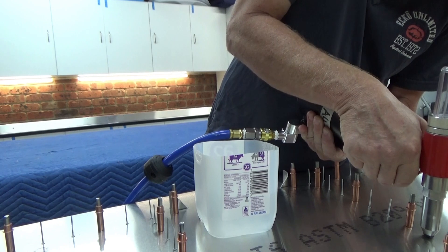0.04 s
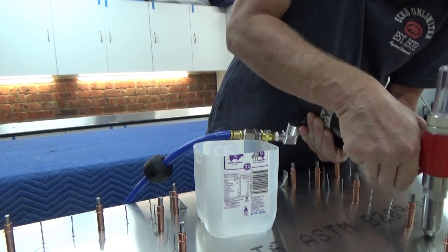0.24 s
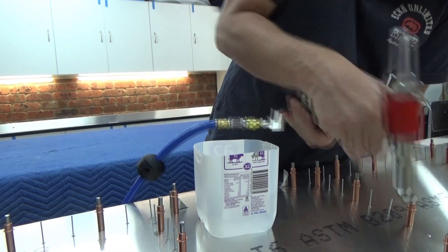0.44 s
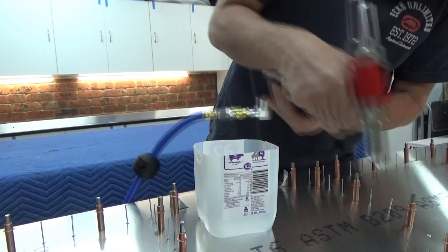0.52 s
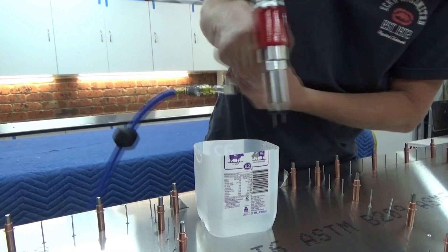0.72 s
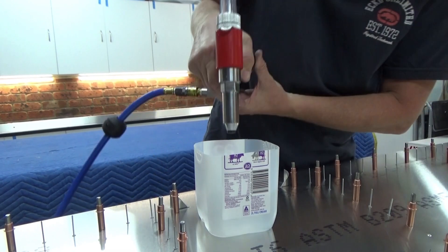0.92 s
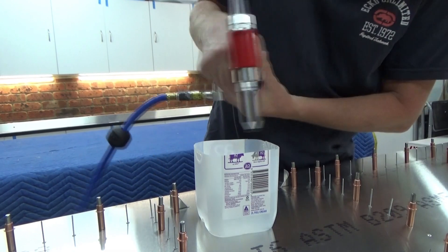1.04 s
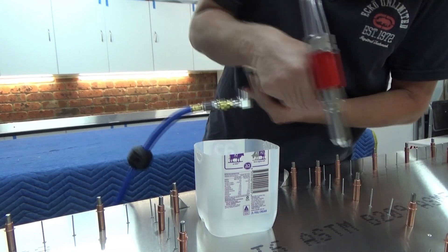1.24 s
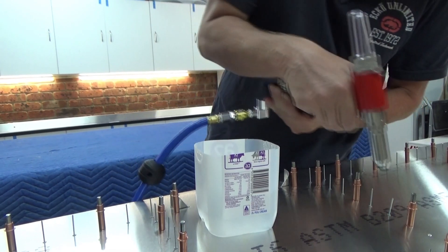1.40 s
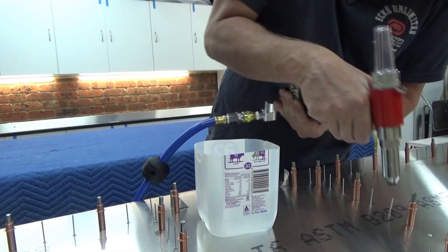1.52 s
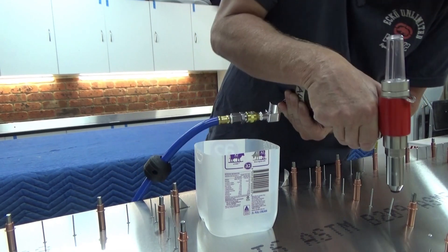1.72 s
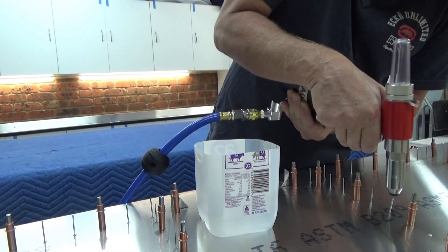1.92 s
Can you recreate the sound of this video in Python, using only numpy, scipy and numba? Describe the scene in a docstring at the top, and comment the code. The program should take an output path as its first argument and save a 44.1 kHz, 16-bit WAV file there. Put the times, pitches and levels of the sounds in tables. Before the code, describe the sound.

A pneumatic rivet gun jolts a metal sheet, blasts a bright hiss of air that clicks off, then a steel stem cracks and bounces in a plastic tub; close stereo in a quiet, humming workshop.

```python
"""Workshop, quiet and humming, heard in close stereo. A pneumatic rivet gun pulls a rivet in an aluminium skin:
random jolts through filters shake the sheet, and jet noise with gliding bands hisses until the valve clicks shut.
The sheet flexes (narrow noise bands); the spent steel stem drops into a plastic tub, bounces and rattles
(noise cracks, damped modes, dense grains). The gun nose is set down on the sheet (modes, noise wash), then slides."""
import sys
import numpy as np
from scipy import signal
from scipy.fft import rfft, irfft
from scipy.io import wavfile
from scipy.ndimage import uniform_filter1d
from numba import njit

SR = 44100
rng = np.random.default_rng(int(sys.argv[2]) if len(sys.argv) > 2 else 0)


def output_pcm(signal):
    """Save a mono or channel-first signal as 16-bit PCM at the path in sys.argv[1].

    Samples are clipped to [-1, 1] before scaling.
    """
    pcm = np.clip(np.atleast_2d(signal).T, -1, 1) * 32767
    wavfile.write(sys.argv[1], SR, np.round(pcm).astype(np.int16))


N = 85995
T = np.arange(N) / SR


def undb(db):
    """Decibels to gain."""
    return 10 ** (np.asarray(db) / 20)


def unit(x):
    """Scale to rms 1."""
    return x / np.sqrt(np.mean(x ** 2) + 1e-18)


def decay(t, t60_s):
    """Exponential fall of 60 dB in t60_s."""
    return np.exp(-np.log(1000) * t / t60_s)


def over_hz(table, hz):
    """Table interpolated on a log-frequency axis."""
    a = np.array(table, float)
    return np.interp(np.log(np.maximum(hz, 1)), np.log(a[:, 0]), a[:, 1])


def colour(x, table):
    """Filter by a magnitude response in dB, via FFT."""
    n = x.shape[-1]
    gain = undb(over_hz(table, np.fft.rfftfreq(n, 1 / SR)))
    return irfft(rfft(x) * gain, n)


def curve(table, axis=1):
    """Table column interpolated over time."""
    a = np.array(table, float)
    return np.interp(T, a[:, 0], a[:, axis])


def level(table, axis=1):
    """Gain from a dB column, silent outside its time span."""
    inside = (T >= table[0][0]) * (T <= table[-1][0])
    return undb(curve(table, axis=axis)) * inside


def grains(per_s, spread_db):
    """Random single-sample clicks of uneven size."""
    hits = rng.random(N) < per_s / SR
    return hits * rng.standard_normal(N) * undb(spread_db * rng.exponential(size=N))


def flicker(rate_hz):
    """Twice-smoothed noise, rms 1."""
    n = int(SR / rate_hz)
    return unit(uniform_filter1d(uniform_filter1d(rng.standard_normal(N), n), n))


@njit
def svf(x, hz, width):
    """State-variable band-pass whose centre may move; width in Hz."""
    y, b, l = np.empty(len(x)), 0., 0.
    for i in range(len(x)):
        g, k = np.tan(np.pi * hz[i] / SR), width / hz[i]
        v = (b + g * (x[i] - l)) / (1 + g * (g + k))
        b, l, y[i] = 2 * v - b, l + 2 * g * v, k * v
    return y


def band(hz, width_hz):
    """Noise through one resonance, rms 1."""
    return unit(svf(rng.standard_normal(N), hz + 0 * T, 1. * width_hz))


def ring(x, modes):
    """Decaying modes struck by x: one complex pole each."""
    out = 0
    for hz, db, t60_s in modes:
        pole = np.exp(2j * np.pi * hz / SR - np.log(1000) / (max(t60_s, .005) * SR))
        out = out + undb(db) * signal.lfilter([1], [1, -pole], x).imag
    return out


def tail(t60s, channels):
    """Half a second of noise, each half octave dying at its own rate."""
    t, out = T[:SR // 2], 0
    for hz in 60 * 2 ** (np.arange(17) / 2):
        noise = [svf(rng.standard_normal(len(t)), hz + 0 * t, hz / 2.8) for _ in range(channels)]
        out = out + np.array(noise) * decay(t, over_hz(t60s, hz))
    return out


def add(out, x, s):
    """Mix x into out at s seconds."""
    i = int(s * SR)
    out[i:i + len(x)] += x[:N - i]


def pan(x, left_db):
    """Left and right copies, left_db apart in level."""
    return x * undb(np.array([[left_db], [-left_db]]) / 2)


# workshop spectrum: f/Hz, relative level/dB
SHOP_SPECTRUM = [(30, -28.5), (42, 9), (171, 6), (379, -4.5), (516, -4), (979, -9.5), (1680, -12),
                 (2220, -15.5), (3910, -18), (4220, -21.5), (5590, -22), (6360, -21.5), (16000, -30.5)]
# narrow hums: f/Hz, width/Hz, level/dB
HUMS = [(520, 15, -59), (3750, 380, -63)]
SHOP_DB = -49


def shop():
    """Workshop rumble and hiss as mid and side noise, plus two narrow wavering hums."""
    hums = sum(undb(db + 4.2 * flicker(4.5)) * band(hz, width_hz) for hz, width_hz, db in HUMS)
    air = np.array([unit(colour(rng.standard_normal(N), SHOP_SPECTRUM)) for _ in range(2)])
    return undb(SHOP_DB + 1.2 * flicker(12)) * air + hums * [[1], [.2]]  # hums mostly mid


# sheet under the stroke: t/s, boom level/dB, rattle level/dB
STROKE_LEVELS = [(.17, -48, -54), (.178, -42, -36.5), (.195, -42, -53), (.204, -39, -53),
                 (.211, -13, -20.5), (.22, -25.5, -13.5), (.25, -19, -25.5), (.272, -29.5, -22.5),
                 (.28, -25.5, -24.5), (.305, -28, -17), (.318, -41.5, -10.5), (.33, -37, -22),
                 (.338, -54, -37)]
# rattle spectrum: f/Hz, relative level/dB
SHAKE_SPECTRUM = [(60, -15.5), (170, -13), (260, 6), (400, -11), (520, -7.5), (900, -13.5), (1250, -9.5),
                  (2500, -20), (5000, -43)]
SHAKE_PER_S, SHAKE_SPREAD_DB = 3000, 2.5
BOOM_HZ, BOOM_WIDTH_HZ = 108, 120


def stroke():
    """Piston stroke: uneven jolts rattle the sheet over one low boom resonance."""
    shake = unit(colour(grains(SHAKE_PER_S, SHAKE_SPREAD_DB), SHAKE_SPECTRUM))
    boom = band(BOOM_HZ, BOOM_WIDTH_HZ)
    return shake * level(STROKE_LEVELS, axis=2) + boom * level(STROKE_LEVELS)


# trigger and valve clicks: t/s, peak level/dB, f/Hz, decay t60/s
CLICK_EVENTS = [(0.173, -39, 8500, .001), (0.8340, -12.5, 2410, .003), (0.8350, -10, 3795, .0035),
                (0.8340, -25, 1300, .003), (0.8424, -22, 3400, .004), (1.8442, -39, 8500, .001)]


def clicks():
    """Trigger and valve: short damped sines with a linear onset."""
    out, t = np.zeros(N), T[:2048]
    for s, db, hz, t60_s in CLICK_EVENTS:
        x = np.sin(2 * np.pi * hz * t) * t * decay(t, t60_s)
        add(out, undb(db) * x / np.abs(x).max(), s)
    return out


# exhaust: t/s, level/dB
EXHAUST_LEVEL = [(0.195, -95), (0.209, -14), (0.213, -16), (0.297, -12.5), (0.331, -17.5), (0.339, -13),
                 (0.483, -13), (0.515, -17), (0.827, -27.5), (0.84, -24), (0.846, -44)]
# jet spectrum: f/Hz, relative level/dB
JET_SPECTRUM = [(250, -49.5), (450, -14.5), (1000, -15.5), (1600, -8), (3000, -4), (4500, -4.5), (6500, -4),
                (11000, -3), (13500, -10), (16000, -22)]
# bands gliding as the gun moves: start t/s, end t/s, start f/Hz, end f/Hz, width/Hz, level re jet/dB
GLIDING_BANDS = [(.18, 0.57, 8170, 8380, 980, -1.5), (0.15, 0.54, 7150, 7280, 1300, -1),
                 (.3, .56, 6600, 6230, 590, -5.5), (0.23, 0.68, 5700, 5200, 620, -7),
                 (0.51, .8, 5000, 4100, 480, -10), (0.13, 0.52, 9300, 9000, 1200, -6),
                 (0.413, .62, 11200, 8600, 2000, -3), (.47, 0.73, 9600, 9100, 1300, -3),
                 (0.54, 0.74, 8900, 7000, 1000, -3), (0.54, 0.837, 10300, 9300, 990, 0),
                 (.59, 0.775, 11300, 8700, 800, -2.5), (0.64, 0.75, 14100, 12300, 1200, -7),
                 (0.55, 0.74, 3300, 3200, 600, -4.5), (0.782, 0.798, 7200, 7900, 880, 0.5),
                 (0.46, 0.58, 1630, 1760, 700, -11.5)]
FLICKER_DB, BAND_FLICKER_DB = 1, 1.8


def exhaust():
    """Exhaust air: broadband jet noise with bands that swell, glide and fade."""
    mix, power = unit(colour(rng.standard_normal(N), JET_SPECTRUM)), 1
    for start, end, from_hz, to_hz, width_hz, db in GLIDING_BANDS:
        share = np.clip((T - start) / (end - start), 0, 1)
        hz = from_hz + (to_hz - from_hz) * share
        swell = undb(db + BAND_FLICKER_DB * flicker(33)) * np.sqrt(np.sin(np.pi * share) + 1e-9)
        # filtered twice: steeper skirts
        mix = mix + swell * unit(svf(band(hz, width_hz), hz, 1. * width_hz))
        power = power + swell ** 2
    steady = mix / np.sqrt(power)  # bands tint the jet, power stays even
    return steady * level(EXHAUST_LEVEL) * undb(FLICKER_DB * flicker(55))


# sheet flexing as the gun lifts away: t/s, level/dB, f/Hz
FLEX_CURVE = [(0.4, -44, 249), (0.496, -41.5, 196), (0.56, -32.5, 161.4), (0.59, -34.5, 148),
              (0.682, -40.5, 192), (0.722, -35, 183.5), (0.824, -43, 165), (0.944, -44, 144),
              (0.98, -46, 173)]
# rumble while the gun moves: t/s, level/dB
RUMBLE_LEVEL = [(0.36, -42.5), (0.402, -50), (0.472, -43.5), (0.812, -46), (1.0, -55)]
FLEX_WIDTH_HZ, RUMBLE_HZ, RUMBLE_WIDTH_HZ = 40, 53.4, 48.3


def flex():
    """Released sheet: a narrow noise band of moving pitch over a low rumble."""
    bend = band(curve(FLEX_CURVE, axis=2), FLEX_WIDTH_HZ) * level(FLEX_CURVE)
    return bend + band(RUMBLE_HZ, RUMBLE_WIDTH_HZ) * level(RUMBLE_LEVEL)


# stem bounces: t/s, peak level/dB, tub ring re peak/dB, steel ring re peak/dB, treble/dB, snap f/Hz
BOUNCE_EVENTS = [(0.9937, -3, -8, -4, -3.5, 3400), (1.045, -3, -11, -23, 12, 3530),
                 (1.0976, -4, -7, -7, 3.5, 4970), (1.1376, -3.5, -25, -9, 10, 9400),
                 (1.1402, -1, -28, -7, 1, 4220), (1.1752, -19.5, -26, -20, 2, 9500),
                 (1.2044, -5.5, -10, -37, 6, 8600), (1.2212, -21, -33, -16, 21, 7000),
                 (1.283, -25, -6, -13, 10, 8220)]
# crack spectrum: f/Hz, relative level/dB
CRACK_SPECTRUM = [(180, -23), (300, 0), (645, -4), (1100, -8.5), (2930, 6), (6960, -13.5), (9390, 0),
                  (13300, -48), (16000, -46)]
# tub modes: f/Hz, level/dB, t60/s
TUB_MODES = [(389, -13, 0.082), (584, -6, 0.1), (701, -7.5, 0.082), (904, -5, 0.037), (1505, -8, 0.035),
             (1764, 2, 0.0265), (2135, 5, 0.016)]
# steel stem modes: f/Hz, level/dB, t60/s
STEM_MODES = [(2775, -8, .025), (3150, -10, .02), (3610, -8, .025), (3810, -10, .02), (4500, -12, .02),
              (6200, -14, .015), (9300, -8, .012)]
# chatter on the tub floor: t/s, level/dB, hollow note level/dB
RATTLE_LEVELS = [(.995, -20, -24), (1.04, -20.5, -31), (1.06, -27, -35), (1.09, -31.5, -31),
                 (1.13, -36, -39), (1.145, -24, -57), (1.18, -29.5, -40), (1.2, -33.5, -49),
                 (1.21, -32.5, -24), (1.235, -36, -37.5), (1.258, -39, -35.5), (1.3, -39.5, -40),
                 (1.4, -95.5, -74)]
# chatter spectrum: f/Hz, relative level/dB
CHATTER_SPECTRUM = [(150, -46), (250, -7), (674, -3.5), (1450, -2.5), (1730, 2), (4190, -1), (4900, -5.5),
                    (9170, -9), (13900, -33), (16000, -53.5)]
# hollow tub note as the stem settles: t/s, f/Hz
HOLLOW_PITCH = [(1.0, 613), (1.12, 597), (1.2, 718), (1.3, 690)]
CRACK_T60_S, TREBLE_HZ = .016, 6620
SNAP_DB, SNAP_T60_S, SNAP_WIDTH_RATIO = 0, .006, .6  # dB re crack; width / centre
RATTLE_PER_S, RATTLE_SPREAD_DB, RATTLE_RING_DB = 14000, 1.5, -14.5
HOLLOW_WIDTH_HZ, TUB_LOW_CUT_HZ = 85, 288


def crack(treble_db, snap_hz):
    """One impact: coloured noise burst plus a shorter band-passed snap of first contact, peak 1."""
    t = T[:2048]
    x = colour(rng.standard_normal(len(t)), CRACK_SPECTRUM)
    x = colour(x, [(TREBLE_HZ / 2, 0), (TREBLE_HZ, treble_db)]) * decay(t, CRACK_T60_S)
    burst = rng.standard_normal(len(t)) * decay(t, SNAP_T60_S)
    snap = svf(burst, snap_hz + 0 * t, SNAP_WIDTH_RATIO * snap_hz)
    x = x / np.abs(x).max() + undb(SNAP_DB) * snap / np.abs(snap).max()
    return x / np.abs(x).max()


def stem():
    """Stem in tub: bounces crack and excite modes; dense grains chatter and a hollow noise band sounds."""
    out, tub, steel = np.zeros(N), np.zeros(N), np.zeros(N)
    for s, db, tub_db, steel_db, treble_db, snap_hz in BOUNCE_EVENTS:
        add(out, undb(db) * crack(treble_db, snap_hz), s)
        add(tub, undb(db + tub_db) * np.hanning(12) / 12, s)
        add(steel, undb([db + steel_db]) / 2, s)
    chatter = grains(RATTLE_PER_S, RATTLE_SPREAD_DB)
    ringing = unit(ring(chatter, TUB_MODES + STEM_MODES))
    rattle = unit(unit(colour(chatter, CHATTER_SPECTRUM)) + undb(RATTLE_RING_DB) * ringing)
    hollow = band(curve(HOLLOW_PITCH), HOLLOW_WIDTH_HZ) * level(RATTLE_LEVELS, axis=2)
    out = out + ring(tub, TUB_MODES) + ring(steel, STEM_MODES)
    out = out + rattle * level(RATTLE_LEVELS) + hollow
    low_cut = signal.butter(3, TUB_LOW_CUT_HZ, "high", fs=SR, output="sos")
    return signal.sosfilt(low_cut, out)


# sheet modes: f/Hz, level/dB, t60/s
SHEET_MODES = [(138, -2.5, 0.83), (211, -23, 0.84), (440, 2, 0.13), (522, -10, 1.27), (549, -12, 0.92),
               (692, 3, 0.33), (1016, -13, .12), (1360, -12, 0.12), (1740, 2, 0.085), (2680, -17, 0.14)]
# set-down wash spectrum: f/Hz, relative level/dB
WASH_SPECTRUM = [(59, -48), (100, -20), (415, -4), (621, -3), (801, -2.5), (891, -8.5), (1800, -13),
                 (4980, -22), (7600, -20), (9500, -13.5), (11000, -25.5), (16000, -42.5)]
# wash decay: f/Hz, t60/s
WASH_DECAY = [(100, 0.62), (700, 0.18), (2500, 0.19), (8000, 0.12), (16000, 0.068)]
# nose sliding onto the next stem: t/s, level/dB
SLIDE_LEVEL = [(1.765, -72.5), (1.775, -53), (1.79, -56), (1.81, -49), (1.85, -52.5), (1.9, -70.5)]
SET_DOWN_S, SET_DOWN_DB, SET_DOWN_TICK_DB, WASH_DB = 1.4872, -30, -29, -22
LATE_WASH_DB, LATE_WASH_STRETCH = -11.5, 2.3
SLIDE_HZ, SLIDE_WIDTH_HZ = 2300, 1500


def nose():
    """Nose on sheet: tick, struck modes, noise wash with a faint longer tail; then grains slide."""
    out, blow = np.zeros(N), np.zeros(N)
    add(blow, undb(SET_DOWN_DB) * np.hanning(10) / 5, SET_DOWN_S)
    late = tail([(hz, LATE_WASH_STRETCH * t60_s) for hz, t60_s in WASH_DECAY], channels=1)
    wash = tail(WASH_DECAY, channels=1) + undb(LATE_WASH_DB) * late
    wash = colour(wash[0], WASH_SPECTRUM)
    onset_rms = np.sqrt(np.mean(wash[:1000] ** 2))
    add(out, undb(WASH_DB) * wash / onset_rms, SET_DOWN_S)
    add(out, undb(SET_DOWN_TICK_DB) * np.diff(np.hanning(8)), SET_DOWN_S)
    slide = unit(svf(grains(12000, 0.95), SLIDE_HZ + 0 * T, 1. * SLIDE_WIDTH_HZ))
    return out + ring(blow, SHEET_MODES) + slide * level(SLIDE_LEVEL)


# room decay: f/Hz, t60/s
ROOM_DECAY = [(100, 0.69), (1000, 0.38), (4000, 0.39), (16000, 0.073)]
# side filter, room and workshop: f/Hz, level/dB
FAR_WIDTH = [(30, -36.5), (500, -11.5), (1500, -5), (4000, -9), (16000, -30)]
# side filter, stroke: f/Hz, level/dB
STROKE_WIDTH = [(100, -14.5), (1000, -7), (3000, -4)]
# side filter, diffuse smear of the near sounds: f/Hz, level/dB
NEAR_WIDTH = [(200, -24.5), (1300, -18), (2400, -22.5), (4400, -35.5), (8000, -24), (16000, -33)]
ROOM_DB, STROKE_ROOM_DB, ROOM_RISE_S = -14.5, -8, 0.017
STROKE_LEFT_DB, NEAR_LEFT_DB = 2.8, -.8  # left minus right
SMEAR_T60_S = .01


def scene():
    """Near sources panned; side adds room, workshop, the same stroke in independent noise, a near smear."""
    pull = stroke()
    near = clicks() + exhaust() + flex() + stem() + nose()
    room = tail(ROOM_DECAY, channels=2) * np.minimum(T[:SR // 2] / ROOM_RISE_S, 1)
    room = room / np.sqrt(np.sum(room ** 2) / 2)
    send = near + undb(STROKE_ROOM_DB) * pull
    wet = signal.fftconvolve(send[None], room, axes=1)[:, :N]
    mid, side = undb(ROOM_DB) * wet + shop()
    side = colour(side, FAR_WIDTH)
    side = side + colour(stroke(), STROKE_WIDTH)  # same stroke, fresh noise: stereo spread
    # short diffuse noise smear of the near sounds, side only
    smear = rng.standard_normal(1024) * decay(T[:1024], SMEAR_T60_S)
    smeared = np.convolve(near, smear / np.linalg.norm(smear))[:N]
    side = side + colour(smeared, NEAR_WIDTH)
    return pan(pull, STROKE_LEFT_DB) + pan(near, NEAR_LEFT_DB) + np.array([mid + side, mid - side])


TOP_HZ = 15800


def record(dry):
    """Recorder: clip at full scale, then a steep elliptic low-pass."""
    low_pass = signal.ellip(10, .2, 90, TOP_HZ, fs=SR, output="sos")
    return signal.sosfilt(low_pass, np.clip(dry, -1, 1))


dry = scene()
out = record(dry)
output_pcm(out)
```